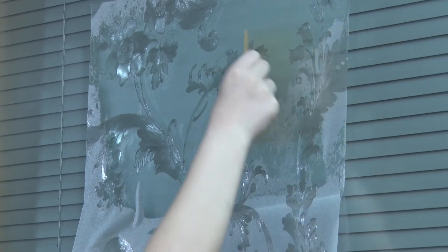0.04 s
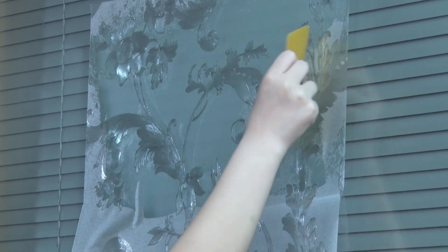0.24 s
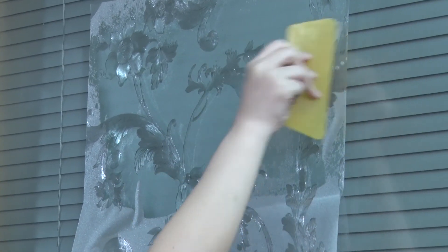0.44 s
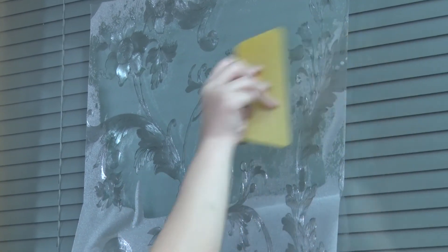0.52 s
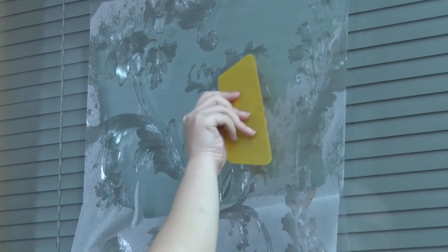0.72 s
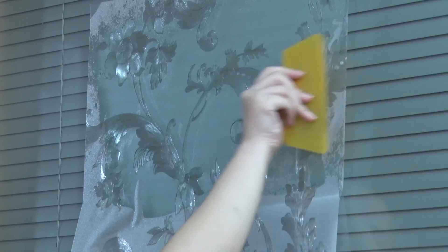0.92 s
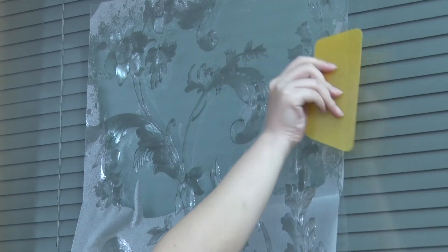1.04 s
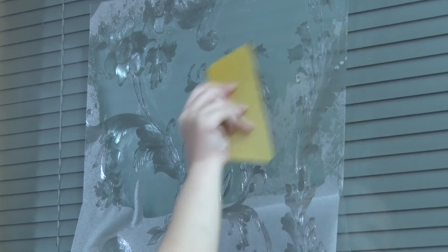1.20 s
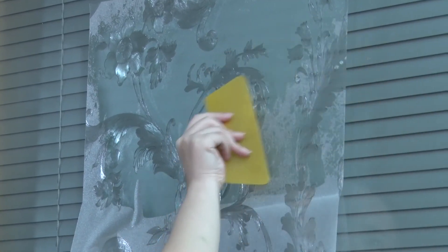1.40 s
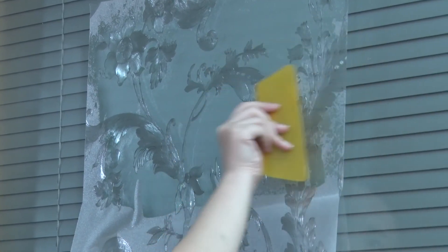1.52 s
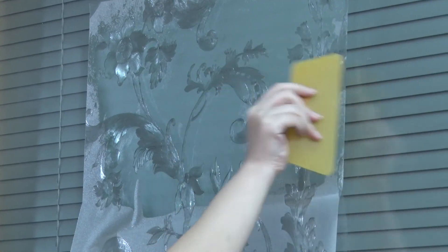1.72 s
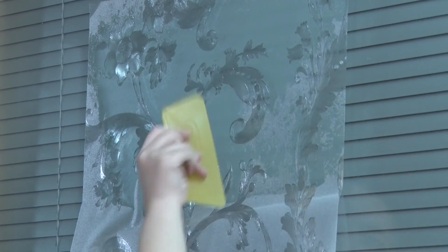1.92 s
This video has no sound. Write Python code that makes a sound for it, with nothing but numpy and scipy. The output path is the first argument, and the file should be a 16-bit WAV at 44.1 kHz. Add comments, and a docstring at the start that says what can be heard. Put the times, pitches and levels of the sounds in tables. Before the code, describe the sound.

A plastic squeegee card scrapes over wet film on a window three times. The first stroke digs in and judders, the next two glide with a thin whistle. Light taps on the glass fall between them in a small room.

```python
"""A light tick, then a swelling rasp: a plastic squeegee card on wet film on a window, three strokes.
Tiny slips of its edge rasp through card and pane; squeezed water fizzes above them.
The first stroke digs in and judders; the other two glide flat with a thin whistle.
Between strokes the card taps the glass as it is lifted and set down. Small room, faint steady air."""
import sys
import numpy as np
from scipy import signal
from scipy.fft import rfft, irfft
from scipy.io import wavfile
from scipy.ndimage import uniform_filter1d

SR = 44100
rng = np.random.default_rng(int(sys.argv[2]) if len(sys.argv) > 2 else 0)


def master_out(mix):
    """Clip the mix to full scale and print it as 16-bit PCM to the path in sys.argv[1]."""
    frames = np.transpose(np.atleast_2d(mix))
    ceiling = np.clip(frames, -1, 1)
    pcm = np.round(ceiling * 32767).astype(np.int16)
    wavfile.write(sys.argv[1], SR, pcm)


N = 85995

# Stroke envelopes: t/s, rasp level/dB, fizz level/dB
TILTED_ENVELOPE = [(0.021, -45.5, -53.5), (0.045, -54, -68.5), (0.125, -55.5, -61), (0.165, -40.5, -53),
                   (0.194, -39.5, -54.5), (0.2, -35, -42.5), (0.228, -33.5, -42), (0.238, -27, -28.5),
                   (0.252, -28.5, -36.5), (0.29, -36.5, -47), (0.311, -37, -50.5), (0.321, -32.5, -38),
                   (0.338, -34, -39)]  # start of stroke 1
DIGGING_ENVELOPES = [
    [(0.319, -32, -54), (0.336, -30, -36.5), (0.346, -24.5, -28), (0.354, -25, -32.5), (0.371, -21, -39.5),
     (0.381, -24, -32), (0.384, -28, -50), (0.406, -38.5, -58)],
    [(0.414, -21.5, -39), (0.423, -19, -30.5), (0.43, -25, -39), (0.437, -21, -29), (0.446, -28, -44),
     (0.451, -30.5, -53), (0.49, -42, -61), (0.56, -57.5, -78)],
]  # rest of stroke 1, two parts
FLAT_ENVELOPES = [
    [(0.775, -58, -75.5), (0.82, -46.5, -53), (0.827, -43, -53.5), (0.868, -35.5, -41), (0.892, -32, -38),
     (0.93, -31.5, -40.5), (0.955, -30.5, -37), (0.983, -35.5, -39), (1.008, -37, -50),
     (1.04, -38.5, -47.5), (1.052, -43, -54.5)],
    [(1.425, -60, -75), (1.44, -46.5, -59.5), (1.47, -39, -43.5), (1.487, -37, -48), (1.5, -35, -43.5),
     (1.524, -37, -46), (1.54, -30, -41.5), (1.575, -33, -38.5), (1.598, -34, -47.5), (1.635, -32, -36.5),
     (1.66, -35, -44.5), (1.688, -32, -50.5), (1.706, -41.5, -55)],
]  # strokes 2 and 3
# Scrape spectrum per card posture: f/Hz, relative level/dB
TILTED_SPECTRUM = [(300, -52), (480, -38.5), (620, -18.5), (800, -18), (980, -8), (1180, 4), (1380, -3.5),
                   (1850, -4), (2100, -9.5), (2450, -7), (2750, -15), (3700, -23), (4400, -19), (5900, -30),
                   (8000, -26.5), (12000, -40), (15500, -46)]
DIGGING_SPECTRUM = [(60, -68), (150, -33), (300, -21), (450, -19), (610, -9), (860, -9), (1100, -2.5),
                    (1330, 0), (1600, -4), (2300, -8.5), (3200, -14.5), (4300, -16.5), (5900, -28.5),
                    (8600, -22), (12000, -39), (13700, -38), (15500, -42)]
FLAT_SPECTRUM = [(200, -35), (450, -34), (610, -16), (800, -11), (930, -1.5), (1070, -4.5), (1260, 5.5),
                 (1550, 0.5), (1850, 2.5), (2130, -9.5), (2600, -14.5), (3300, -16), (3800, -23.5),
                 (4150, -20), (5600, -26), (7500, -24.5), (11000, -33.5), (12500, -39), (15500, -43.5)]
# Edge whistle per flat stroke: f/Hz, width/Hz, boost/dB
WHISTLES = [(3014, 300, 9), (2980, 150, 6.5)]
# Edge chatter: t/s, length/s, slip rate/Hz, relative level/dB
JUDDERS = [(0.3185, .002, 1280, -26), (0.373, .0035, 1146, -9.5), (0.4104, .0045, 1340, -9),
           (0.4222, 0.0025, 1180, -29), (0.836, .002, 1200, -30), (1.492, .002, 1300, -26),
           (1.535, .003, 1470, -23.5), (1.657, .002, 1390, -23), (1.6824, 0.0034, 1500, -32)]
# Card-on-glass contacts: t/s, knock gain/dB, tick gain/dB, tick cutoff/Hz
TAPS = [(0.0183, -48, -25, 10300), (0.057, -54, -30.5, 6000), (0.085, -56, -38.5, 14500),
        (0.378, -15, -7.5, 9100), (0.3913, -22, -9.5, 10000), (0.399, -32, -18, 10000),
        (0.4102, -26, -6.5, 8100), (0.4158, -11, -12, 7900), (0.4335, -17, -6.5, 12100),
        (0.483, -28, -27.5, 14000), (0.606, -46, -36.5, 6850), (0.6517, -44, -33, 7750),
        (0.6605, -23.5, -24.5, 16000), (0.6707, -26.5, -27.5, 6100), (0.7416, -32.5, -30.5, 3500),
        (0.761, -33, -33, 1980), (1.05, -39, -28.5, 14000), (1.262, -54, -35, 11100),
        (1.338, -25.5, -22, 14300), (1.341, -19, -23, 14000), (1.704, -35, -35, 12000),
        (1.838, -72, -44, 10000), (1.842, -93, -39, 10000), (1.872, -54, -50, 4500)]
# Contact tick spectrum: f/Hz, gain/dB
TICK_SPECTRUM = [(80, -27), (400, -4), (1200, 6.5), (2400, 7), (4500, -1), (7500, -2), (11000, -9),
                 (15500, -23)]
# Hand pushes on the pane: t/s, gain/dB
THUDS = [(0.262, -75), (0.424, -49.5), (1.342, -54.5)]
# Modes: f/Hz, relative level/dB, T60/s
CARD_MODES = [(637, -28, 0.028), (997, -22.5, 0.017), (1281, -5.5, 0.015), (2020, -15, 0.01),
              (2390, -21, 0.018), (3500, -18.5, 0.015)]  # card held against the glass
PANE_MODES = [(618, 9, 0.13), (685, 5, 0.34), (863, 2, 0.25), (944, -6, 0.24), (1164, -7, 0.35),
              (1390, -23, 0.13)]  # long ring of the pane
THUD_MODES = [(47, -4, 0.36), (98, 3, 0.16), (175, -3, 0.15), (227, -9.5, 0.13)]  # whole pane flexing
# Room decay: f/Hz, T60/s
ROOM_DECAY = [(150, 0.84), (1200, 0.44), (4000, 0.52), (8000, 0.3), (15000, 0.56)]
# Room air spectrum: f/Hz, relative density/dB
AIR_SPECTRUM = [(20, -11.5), (45, -6.5), (100, -8.5), (130, -5), (185, -2.5), (290, -8.5), (450, -12),
                (620, -10.5), (900, -17), (1280, -14.5), (2400, -28), (6000, -37), (15500, -42)]

FILTER_SIZE = 4096
FILTER_GRID_HZ = np.fft.rfftfreq(FILTER_SIZE, 1 / SR)


def strokes():
    """One stroke that starts tilted and digs in, then two flat, whistling ones."""
    tilted = scrape(TILTED_ENVELOPE, TILTED_SPECTRUM)
    digging = sum(scrape(part, DIGGING_SPECTRUM) for part in DIGGING_ENVELOPES)
    flat = sum(scrape(part, FLAT_SPECTRUM, [whistle]) for part, whistle in zip(FLAT_ENVELOPES, WHISTLES))
    return tilted + digging + flat


def scrape(envelope, spectrum, whistles=(), fade_s=0.001, crossover_hz=3260):
    """Edge slips rasp below the crossover; finer bursts of squeezed water fizz above it."""
    times_s, rasp_db, fizz_db = np.transpose(envelope)
    t, hz = np.arange(N) / SR, FILTER_GRID_HZ
    contact = np.clip(1 + np.minimum(t - times_s[0], times_s[-1] - t) / fade_s, 0, 1)
    whistle_db = sum(db / (1 + (2 * (hz - peak_hz) / width_hz) ** 2) for peak_hz, width_hz, db in whistles)
    gain = amp(at_hz(spectrum, hz) + whistle_db)
    low_share = 1 / (1 + (hz / crossover_hz) ** 8)
    slips = clicks(per_s=3200, spread_db=2) * contact * amp(np.interp(t, times_s, rasp_db))
    bursts = clicks(per_s=9000, spread_db=3.5) * contact * amp(np.interp(t, times_s, fizz_db))
    rasp = convolve(slips, min_phase(unit_rms(gain * np.sqrt(low_share))))
    fizz = convolve(bursts, min_phase(unit_rms(gain * np.sqrt(1 - low_share))))
    return rasp + fizz


def clicks(per_s, spread_db):
    """Random impulses of uneven size, rms 1."""
    size = amp(spread_db * np.minimum(rng.exponential(1, N), 4))
    return unit_rms(size * rng.choice([-1, 1], N) * (rng.random(N) < per_s / SR))


def judders(gain_db=-4, swell_db=0.5, jitter_periods=0.03):
    """The edge catches: a few nearly regular slips drive the card near its own pitch."""
    drive = np.zeros(N)
    for start_s, length_s, rate_hz, db in JUDDERS:
        for age_s, shift in zip(np.arange(0, length_s, 1 / rate_hz), rng.standard_normal(32)):
            slip_s = start_s + age_s + jitter_periods * shift / rate_hz
            slip_db = db + swell_db * (age_s / length_s - 1.5)
            add(drive, slip_s, [amp(slip_db)])
    return amp(gain_db) * convolve(drive, card_knock())


def taps(crackle_s=0.0021, scatter=0.3):
    """Card meets glass: a short crackling tick plus a knock."""
    out, knock = np.zeros(N), card_knock()
    t, hz = np.arange(1000) / SR, FILTER_GRID_HZ
    for start_s, knock_db, tick_db, cutoff_hz in TAPS:
        crackle = (t == 0) + scatter * rng.standard_normal(len(t)) * np.exp(-t / crackle_s)
        tick_gain = amp(at_hz(TICK_SPECTRUM, hz)) / np.sqrt(1 + (hz / cutoff_hz) ** 6)
        add(out, start_s, amp(tick_db) * convolve(crackle, min_phase(tick_gain)))
        add(out, start_s, amp(knock_db) * knock)
    return out


def card_knock(band_hz=(486, 2200)):
    """The card rings after a slightly soft blow; too small to carry bass."""
    return signal.lfilter(*signal.butter(2, band_hz, "band", fs=SR), ring(CARD_MODES))


def pane_ring(card, gain_db=-69.5):
    """The card drives the pane's long-ringing modes."""
    return amp(gain_db) * convolve(card, ring(PANE_MODES))


def thuds():
    """The whole pane gives a little under the hand."""
    out = np.zeros(N)
    for start_s, db in THUDS:
        add(out, start_s, amp(db) * ring(THUD_MODES))
    return out


def rumble(rms_db=-64, corner_hz=153, exponent=0.59):
    """Dragging shakes the pane, by a power law of the rasp amplitude."""
    t, hz = np.arange(N) / SR, np.fft.rfftfreq(N, 1 / SR)
    effort = np.zeros(N)
    for envelope in [TILTED_ENVELOPE, *DIGGING_ENVELOPES, *FLAT_ENVELOPES]:
        times_s, rasp_db, _ = np.transpose(envelope)
        effort += np.interp(t, times_s, amp(rasp_db), left=0, right=0)
    effort = np.maximum(uniform_filter1d(effort, size=600), 0)
    noise = irfft(rfft(rng.standard_normal(N)) / (1 + (hz / corner_hz) ** 2), N)
    return amp(rms_db) * unit_rms(noise * effort ** exponent)


def room(x, early_db=-14.5, early_decay_s=0.012, echoes_per_s=1500, tail_db=-16.5):
    """Quick reflections off window and blinds, then a faint tail, longest in the bass."""
    t = np.arange(SR // 2) / SR
    early = rng.standard_normal(len(t)) * (rng.random(len(t)) < echoes_per_s / SR)
    early *= (t > 0.002) * np.exp(-t / early_decay_s)
    hz, age_s, bins = signal.stft(rng.standard_normal(len(t)) * (t > 0.008), SR, nperseg=256)
    decay = np.exp(-np.log(1000) * age_s / at_hz(ROOM_DECAY, hz)[:, None])
    _, tail = signal.istft(bins * decay, SR, nperseg=256)
    reflections = amp(early_db) * convolve(x, early / np.linalg.norm(early))
    return reflections + amp(tail_db) * convolve(x, tail / np.linalg.norm(tail))


def air(rms_db=-58):
    """Low, steady room noise."""
    gain = amp(at_hz(AIR_SPECTRUM, np.fft.rfftfreq(N, 1 / SR)))
    noise = irfft(rfft(rng.standard_normal(N)) * gain, N)
    return amp(rms_db) * unit_rms(noise)


def ring(modes):
    """Decaying modes after one blow."""
    t = np.arange(SR // 2) / SR
    return sum(amp(db) * np.exp(-np.log(1000) * t / t60_s) * np.cos(2 * np.pi * hz * t)
               for hz, db, t60_s in modes)


def min_phase(gain):
    """Causal impulse response for a gain on FILTER_GRID_HZ."""
    log_gain = np.log(np.maximum(np.r_[gain, gain[-2:0:-1]], 1e-5))
    spectrum = np.exp(np.conj(signal.hilbert(log_gain)))
    return np.fft.ifft(spectrum).real[:FILTER_SIZE // 2]


def at_hz(table, hz):
    """Interpolate over log frequency."""
    points_hz, values = np.transpose(table)
    return np.interp(np.log(hz + 1), np.log(points_hz + 1), values)


def amp(db):
    return 10 ** (np.asarray(db) / 20)


def unit_rms(x):
    return x / np.sqrt(np.mean(x ** 2) + 1e-20)


def add(mix, start_s, sound):
    part = mix[round(start_s * SR):][:len(sound)]
    part += sound[:len(part)]


def convolve(x, response):
    return signal.fftconvolve(x, response)[:N]


def scene():
    """Card and pane in the room, mono."""
    card = strokes() + judders() + taps()
    window = card + pane_ring(card) + thuds() + rumble()
    return (window + room(window) + air())[None]


def record(dry):
    """Steep low-pass at 15780 Hz."""
    lowpass = signal.firwin(511, 15780, window=("kaiser", 9), fs=SR)
    return signal.oaconvolve(dry, lowpass[None], "same")


dry = scene()
out = record(dry)
master_out(out)
```